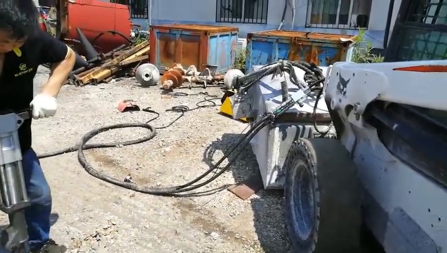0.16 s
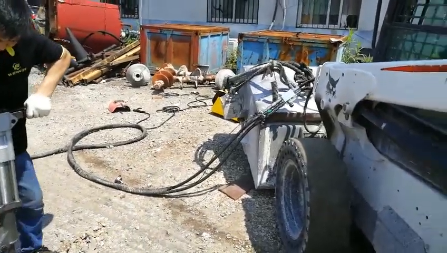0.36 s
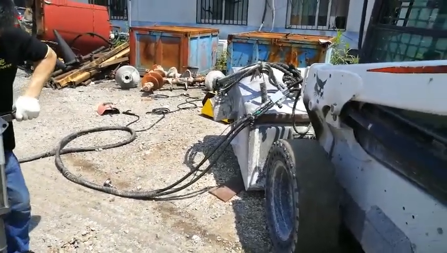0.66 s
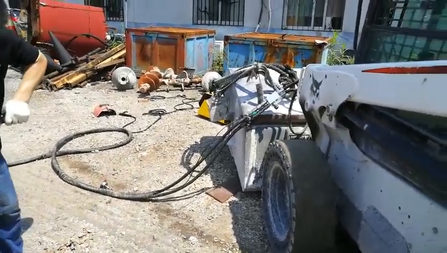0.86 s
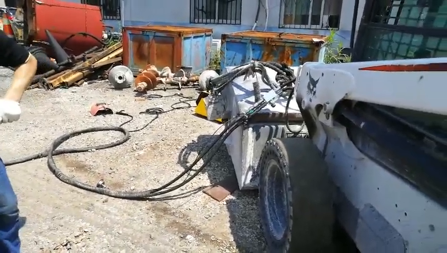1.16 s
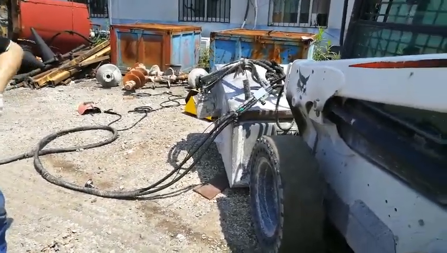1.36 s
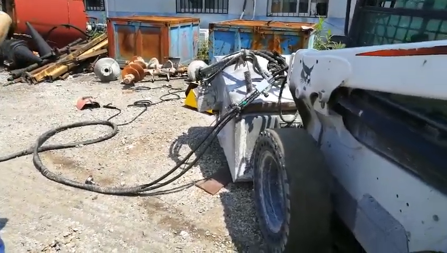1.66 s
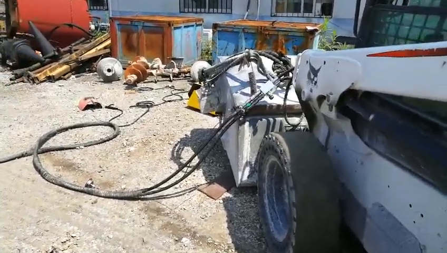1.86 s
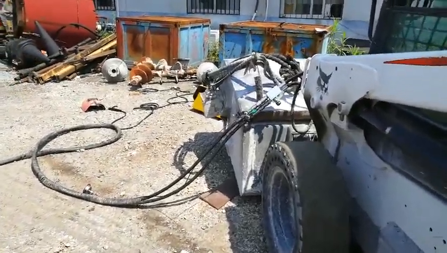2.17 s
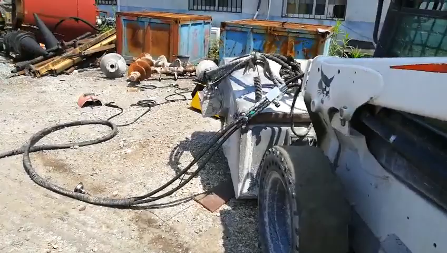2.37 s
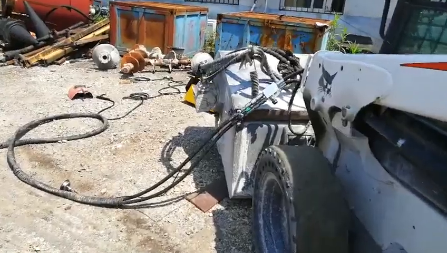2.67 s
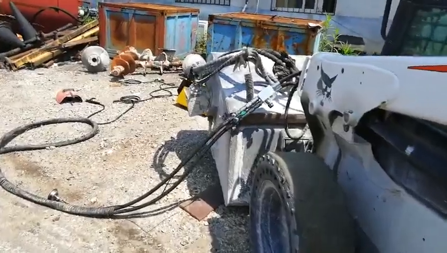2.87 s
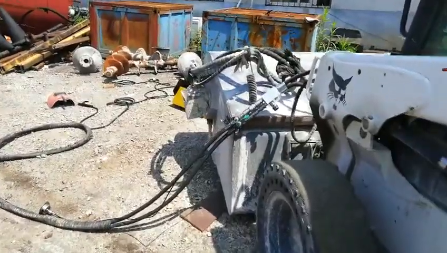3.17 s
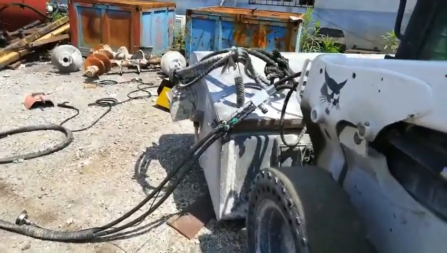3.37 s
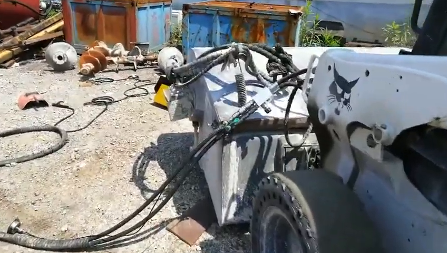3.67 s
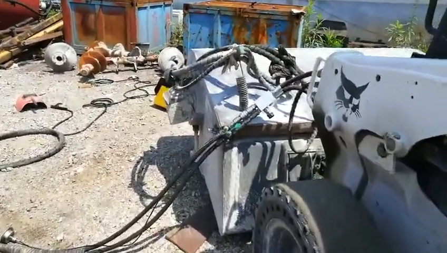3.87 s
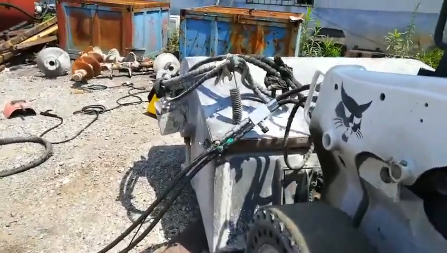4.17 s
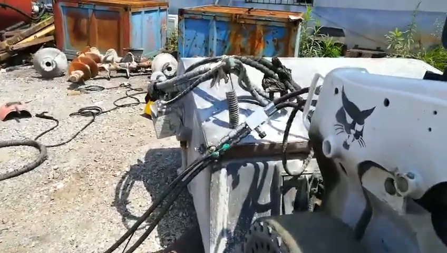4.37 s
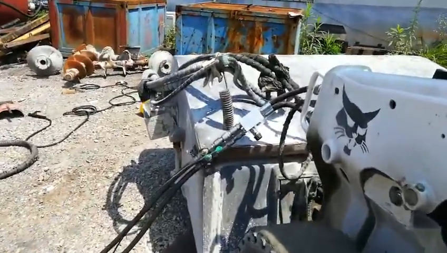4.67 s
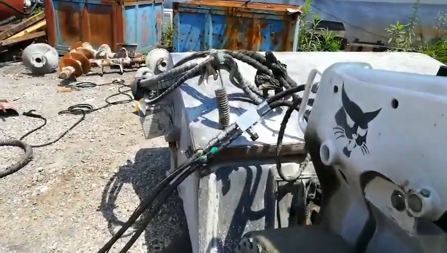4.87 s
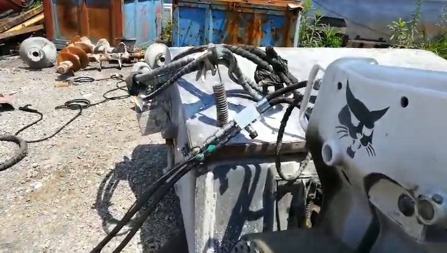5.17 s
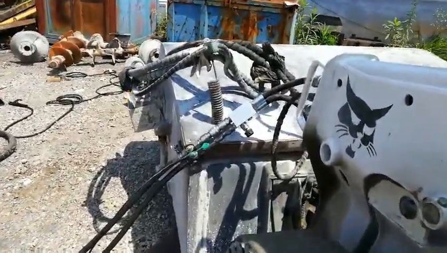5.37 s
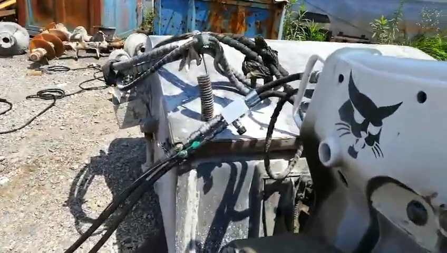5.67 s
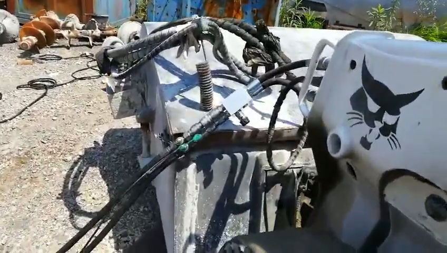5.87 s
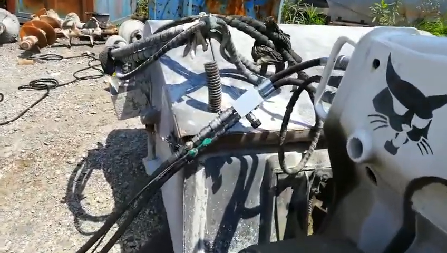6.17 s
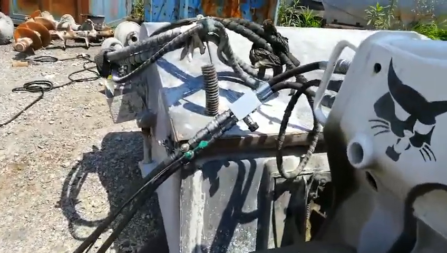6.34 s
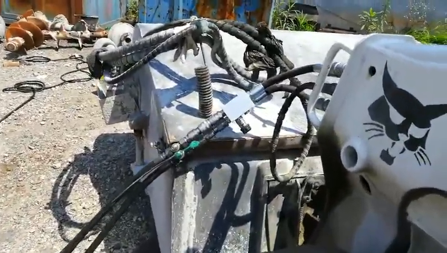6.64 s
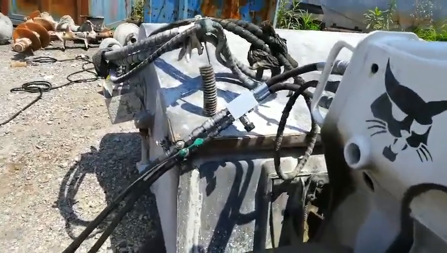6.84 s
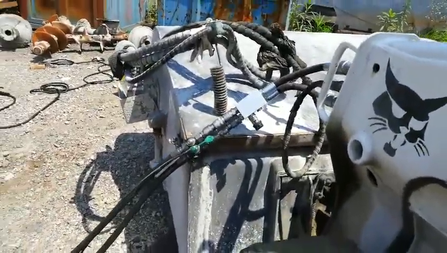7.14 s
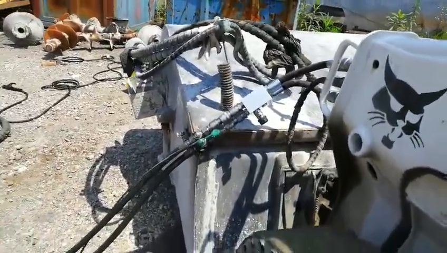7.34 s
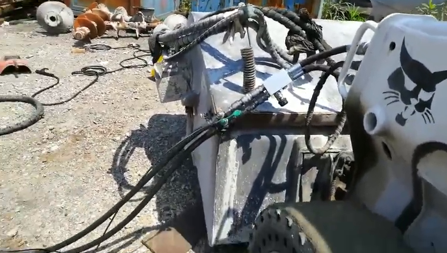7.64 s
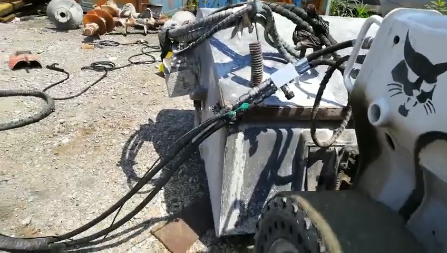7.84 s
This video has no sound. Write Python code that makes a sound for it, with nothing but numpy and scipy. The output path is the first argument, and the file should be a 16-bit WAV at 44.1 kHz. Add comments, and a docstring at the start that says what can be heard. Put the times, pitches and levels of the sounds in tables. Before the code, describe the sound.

Outdoors in a scrapyard, a hydraulic breaker rattles off short, stuttering runs of hard metallic blows with ringing steel. It stops, and a nearby diesel loader's pulsing idle, fan and oil hiss rise. Hammering resumes louder and more rattly, pauses, fires a last short pair of runs, and the chisel rings free before the idle takes over. Handheld stereo microphones move toward the loader; automatic gain ducks on blows and lifts the pauses.

```python
"""An open yard in stereo: a handheld hydraulic breaker fed by hoses from an idling diesel loader.
Runs of piston blows open the scene: each cracks, clanks, thuds, rattles the tool and rings the steel chisel.
From 1.4 s the loader (engine tones, pulsing noise, fan, oil hiss) fills a pause; runs resume at 2.7 s until 5.5 s.
Two more runs start at 6.2 s; the chisel then rings free from 6.77 s, and a faint hiss passes at 7.55 s over the idle.
The microphones are carried toward the loader, and gain control lifts it in every pause."""
import sys
import numpy as np
from scipy import signal
from scipy.fft import rfft, irfft
from scipy.io import wavfile
from scipy.ndimage import uniform_filter1d, minimum_filter1d

SR = 44100
rng = np.random.default_rng(int(sys.argv[2]) if len(sys.argv) > 2 else 0)


def pcm_store(signal):
    """Save signal as 16-bit PCM."""
    levels = np.round(np.clip(np.atleast_2d(signal), -1, 1) * 32767)
    wavfile.write(sys.argv[1], SR, levels.astype(np.int16).T)


N = 353241
SIZE = 4096  # samples in one short sound
AGE = np.arange(SIZE) / SR  # seconds since a short sound began
TIME = np.arange(N) / SR


def amp(db):
    """Decibels to amplitude gain."""
    return 10 ** (np.asarray(db) / 20)


def unit(x):
    """Scales to rms 1."""
    return x / np.sqrt(np.mean(x ** 2) + 1e-20)


def read(points, hz, axis=1):
    """One column of a table, interpolated over log frequency."""
    table = np.transpose(points)
    return np.interp(np.log(hz + 1), np.log(table[0] + 1), table[axis])


def follow(rows, at=TIME):
    """Every column of a curve at the given places, by default at each sample."""
    places, *columns = np.transpose(rows)
    return [np.interp(at, places, column) for column in columns]


def add(mix, start_s, sound):
    """Mixes a stereo sound in at its start time, cut at the end of the scene."""
    part = mix[:, max(round(start_s * SR), 0):][:, :sound.shape[1]]
    part += sound[:, :part.shape[1]]


def colour(x, points):
    """Gives noise a spectrum, at rms 1."""
    size = x.shape[-1]
    gain = amp(read(points, np.fft.rfftfreq(size, 1 / SR)))
    return unit(irfft(rfft(x) * gain, size))


def pan(db):
    """Left and right gains of constant power from the left minus right level."""
    sides = amp(np.array([db, -db]) / 2)
    return sides / np.sqrt((amp(db) + amp(-db)) / 2)


def drift(rate):
    """Slow random wavering of rms 1, with a new random target rate times a second."""
    knots = rng.standard_normal(int(N / SR * 200))
    return unit(np.interp(TIME * rate, np.arange(len(knots)), knots))


def burst_noise(shared=0.39, lag_s=.00055):
    """A short stereo noise whose shared direct part reaches the right microphone first."""
    direct, *scattered = rng.standard_normal((3, SIZE))
    share = np.clip(shared, 0, 1)
    arrivals = np.array([np.roll(direct, round(lag_s * SR)), direct])
    return np.sqrt(share) * arrivals + np.sqrt(1 - share) * np.array(scattered)


def strike(length, rise=0.0033, steep=2.03):
    """A blow swells quickly, holds for its length and falls away in nearby reflections."""
    return np.clip(AGE / rise, 0, 1) / np.sqrt(1 + (AGE / length) ** (2 * steep))


def yard(x, low_t60=0.41, high_t60=0.36, delay=0.022):
    """Thin scatter from walls and scrap: decaying noise that sets in after the delay; the treble dies first."""
    hz, t, grain = signal.stft(rng.standard_normal((2, SR // 2)), SR, nperseg=256)
    t60 = read([(1000, low_t60), (14000, high_t60)], hz)[:, None]
    fading = grain * amp(-60 * t / t60) * np.clip(t / delay - 1, 0, 1)
    tail = signal.istft(fading, SR, nperseg=256)[1]
    return signal.fftconvolve(x, tail / np.linalg.norm(tail[0]), axes=1)[:, :N]


# The loader as the microphones are carried toward it, before the trims and wavering below:
# (time [s], engine [dB], exhaust drone [dB], fan hum [dB], fan whine [dB], oil hiss [dB])
LOADER_LEVELS = [(0, -48, -54, -56, -60, -49), (1.4, -33.5, -44.5, -43.5, -49, -46.5),
                 (2.55, -33.5, -47, -45, -45.5, -45.5), (4.0, -39, -53, -51.5, -66, -48),
                 (5.35, -35.5, -52, -47, -48, -44.5), (5.9, -34, -54, -38.5, -47, -46.5),
                 (6.4, -35.5, -52, -50.5, -41, -44.5), (8.0, -33.5, -48, -44, -43.5, -42)]
# The diesel sags and hunts under hydraulic load, jitter aside: (time [s], firing rate [1/s])
FIRING_RATE = [(1.45, 39.4), (1.66, 40.7), (1.95, 40.3), (2.35, 40.3), (2.58, 41.3), (3.0, 39.6),
               (5.6, 39.0), (5.78, 40.7), (6.0, 41.2), (6.3, 38.1), (6.55, 39.6), (6.9, 38.0), (7.24, 39.9),
               (7.5, 38.2), (7.85, 39.1)]
# Engine tones: (multiple of the firing rate, level against the engine [dB])
ENGINE_ORDERS = [(1, -14), (2, -22.5), (5, -23), (6.5, -19), (7.5, -22.5), (8, -17.5), (9, -15), (13, -25),
                 (17, -23), (19.5, -19.5), (23, -16), (26.5, -19), (29.5, -22)]
# Exhaust tones: (multiple of the firing rate, level against the drone [dB])
EXHAUST_ORDERS = [(3, -1.5), (3.501, -11), (3.73, -4), (4, -8.5)]
# Spectrum of the block and fan: (frequency [Hz], relative level [dB per Hz])
ROAR_SPECTRUM = [(20, -19), (60, -19), (110, -6.5), (190, -1.5), (320, 0), (560, -1.5), (950, 0),
                 (1500, -5), (2600, -8.5), (3900, -14), (5500, -22), (16000, -25)]
# Spectrum of the oil in the valves: (frequency [Hz], relative level [dB per Hz])
HISS_SPECTRUM = [(1000, -21), (3800, 8), (6000, -1.5), (7600, -3.5), (9300, 1), (11000, -2.5), (12800, 5.5),
                 (16000, -12)]
# The loader at the two microphones:
# (frequency [Hz], left-right likeness [0-1], lead of the left [rad], left minus right [dB])
LOADER_STEREO = [(40, 0.92, 0.26, -0.5), (125, 0.86, 0.44, 0), (298, 1, -1.35, 1), (670, 0.86, -2.5, -8.5),
                 (1320, 0.58, -2, -2), (2360, 0.27, -2.5, -7), (4250, 0.12, -5.5, -3),
                 (15000, 0.074, -5, 0.5)]
FAN_RATIO = 5.56  # blades passing per firing


def loader(knock=0.43, knock_width=0.22, waver_db=1.33, jitter=.003, roar_db=-1.0, regular=0.27):
    """Diesel orders, exhaust drone, a roar pulsing with each firing, the cooling fan and oil hissing in the valves."""
    engine_db, drone_db, hum_db, whine_db, hiss_db = follow(LOADER_LEVELS)
    rate = follow(FIRING_RATE)[0] * (1 + jitter * drift(14))
    firings = np.cumsum(rate) / SR

    def tone(order):
        phase = 2 * np.pi * (order * firings + rng.random()) + 0.18 * drift(12)
        return np.sqrt(2) * np.sin(phase) * amp(waver_db * drift(9))

    tones = amp(engine_db) * sum(amp(db) * tone(order) for order, db in ENGINE_ORDERS)
    tones += amp(drone_db) * sum(amp(db) * tone(order) for order, db in EXHAUST_ORDERS)
    # blade passing and its octave
    tones += amp(hum_db) * tone(FAN_RATIO) + amp(whine_db) * tone(2 * FAN_RATIO)

    pulse = unit(1 + knock * (2 + drift(40)) * np.exp(-(firings % 1) / knock_width))
    # valves and gears clatter alike on every turn of the crank (two firings); the rest is turbulence
    one_turn = rng.standard_normal((2, 2200))
    clatter = one_turn[:, (firings / 2 % 1 * one_turn.shape[1]).astype(int)]
    share = np.clip(regular, 0, 1)
    drive = np.sqrt(share) * clatter + np.sqrt(1 - share) * rng.standard_normal((2, N))
    roar = amp(engine_db + roar_db + 0.73 * drift(16)) * colour(drive * pulse, ROAR_SPECTRUM)
    hiss = amp(hiss_db + 0.66 * drift(8)) * colour(rng.standard_normal((2, N)), HISS_SPECTRUM)

    # the two microphones hear the low roar alike but out of step, and the hiss apart
    hz = np.fft.rfftfreq(N, 1 / SR)
    direct, diffuse = rfft(roar + hiss)
    tone_spectrum = rfft(tones)
    like = np.clip(read(LOADER_STEREO, hz), 0, 1)
    left = direct + tone_spectrum
    right = like * direct + np.sqrt(1 - like ** 2) * diffuse + tone_spectrum
    right = right * np.exp(-1j * read(LOADER_STEREO, hz, axis=2))
    return irfft(np.array([left, right]) * pan(read(LOADER_STEREO, hz, axis=3)), N)


def hiss_puff(start=7.55, stop=7.8, db=-46.0):
    """A brief, faint high hiss: band-shaped noise under a half-sine swell."""
    swell = np.sin(np.pi * np.clip((TIME - start) / (stop - start), 0, 1))
    spectrum = [(7000, -35), (8700, -1), (9400, 0), (10800, -22), (13000, -35)]  # (Hz, dB per Hz)
    return amp(db) * swell * colour(rng.standard_normal((2, N)), spectrum)


# Spectrum of a light click: (frequency [Hz], relative level [dB per Hz])
TICK_SPECTRUM = [(300, -25), (2000, 3.5), (3500, 1), (5000, -5), (12000, -9), (16000, -12)]
# Light clicks of valve and couplings: (time [s], level [dB])
TICK_TIMES = [(1.492, -31), (2.067, -27), (2.198, -29), (2.647, -26), (4.533, -28), (6.136, -26),
              (6.357, -34), (6.413, -27), (6.468, -32), (6.522, -27), (6.578, -27), (6.630, -24),
              (6.688, -29), (6.742, -27)]


def ticks():
    """Short metallic clicks between the blows: bursts of bright noise."""
    out = np.zeros((2, N))
    for s, db in TICK_TIMES:
        add(out, s, amp(db) * colour(burst_noise(), TICK_SPECTRUM) * strike(0.003, rise=.001))
    return out


# The piston cycles in runs; levels are the run's base, before stalling, chance and trims. One row a run:
# (first blow [s], last blow [s], blows [count], slowing [0 steady, negative quickens], crack [dB],
#  crack length [s], rattle [dB], chisel ring [dB], cut in rattle and ring when every second blow
#  finds the chisel pressed down [dB, negative boosts])
BLOW_RUNS = [(-.007, 0.115, 5, 0, -11, 0.0033, -26.5, -30, -1.5),
             (0.143, 0.235, 4, 0.0022, -11, 0.0031, -19, -21.5, 1),
             (.27, .415, 5, 0.023, -11, 0.0028, -19, -20, -1.5),
             (.449, 0.626, 6, 0.19, -5, .0035, -23, -21.5, 1.5),
             (.678, .804, 5, 0.17, -8.5, .0032, -28, -21, 0),
             (.855, 1.016, 6, 0.064, -6.5, 0.0033, -28, -23, 0.5),
             (1.066, 1.154, 4, .2, -8, .0033, -32.5, -45, -3),
             (1.197, 1.326, 4, 0.13, -5.5, 0.0041, -26, -43, 2),
             (2.686, 2.873, 7, -.03, -5, .0031, -10.5, -24, 2),
             (2.901, 3.009, 5, 0.014, -3, .0033, -13, -26, 2),
             (3.04, 3.187, 6, -0.024, -6, 0.0073, -19, -33, 3),
             (3.218, 3.312, 4, 0.039, -4, 0.0043, -9, -24.5, 6),
             (3.34, 3.527, 7, 0, -5.5, 0.0052, -21.5, -32, 1),
             (3.56, 3.633, 3, .02, -5.5, .0053, -27, -29, 2),
             (3.671, 3.708, 2, 0, -3.5, .004, -17, -19, 16), (3.742, 3.782, 2, 0, -5, .0046, -26, -39, 0),
             (3.823, 3.927, 4, -0.02, -3.5, 0.0041, -24, -22, 16),
             (3.965, 4.049, 3, 0.077, -5.5, 0.005, -31, -52, -2),
             (4.092, 4.167, 3, -0.13, -9, 0.0052, -18, -26, 14),
             (4.205, 4.278, 3, .18, -6, 0.0043, -29, -44, 2),
             (4.319, 4.463, 5, -.07, -6, 0.0047, -25, -29, 10),
             (4.51, 4.561, 2, 0, -3, 0.0044, -22, -50, -2),
             (4.604, 4.745, 5, -0.081, -7.5, 0.004, -26, -28.5, 11),
             (4.797, 4.979, 6, 0.054, -6.5, 0.0041, -32, -41, -1),
             (5.02, 5.364, 10, -0.007, -6, 0.0038, -33.5, -50, -2),
             (5.406, 5.537, 4, -0.027, -5.5, 0.0045, -26, -52, 1),
             (6.168, 6.325, 5, 0.29, -5, 0.0042, -41, -52, 2),
             (6.378, 6.763, 8, 0.0071, -5.5, 0.0044, -23, -50, 0)]


def rhythm():
    """One row a blow; in a slowing run the gaps widen as the oil pressure sinks."""
    rows = []
    for first, last, count, slowing, crack, length, rattle, ringing, pressed_db in BLOW_RUNS:
        for k, u in enumerate(np.linspace(0, 1, round(count))):
            s = first + (last - first) * (u - slowing * u * (1 - u))
            cut_db = pressed_db * (k % 2)
            rows.append((s, crack, length, rattle - cut_db, ringing - cut_db))
    return np.array(rows)


# Short of oil the piston stalls: a blow before a long wait is weak and dull, the tool loose in its socket.
STALL_FROM_S, STALL_OVER_S = 0.04076, 0.009  # wait where stalling begins, and further wait to a full stall
PAUSE_S = .1  # a wait this long is a pause: no refill or reseating follows
STALL_CRACK_DB, STALL_LOW_MID_DB, STALL_CLANK_DB, STALL_RING_DB = -3.5, -5, -30, -17.5  # changes
LOOSE_RATTLE_DB = -24  # rattle of a full stall, before chance and trim
REFILL_DB = 2  # the blow after a stall has fresh pressure behind it
RESEAT_DB = -11  # and finds the chisel seated: less ring and rattle
# How the tool bears on the ground, before stalling, chance and trims:
# (time [s], low-mid colour [dB], clank of the housing [dB], thud [dB])
GROUND_FOOTING = [(0, -5.5, -8.5, -36), (.5, 3, -7, -28), (.95, -3, -6.5, -45), (1.25, -4.5, -12.5, -36),
                  (2.7, 8, -11, -28.5), (3.05, 1.5, -17, -28), (3.65, 3, -12, -23), (4.05, -1, -14, -26.5),
                  (5.3, -2, -15.5, -33), (6.3, -1, -15, -34), (6.7, -1.5, -17, -35)]
# Leaning on the chisel shifts its ring between the mode families:
# (time [s], bending against lengthwise [dB], shrill against lengthwise [dB])
CHISEL_LEAN = [(0, -24, -11), (.17, -3, -13), (.38, -2, -10), (.5, -10, -3), (1, -11, -7), (2.7, -6, 1),
               (2.95, 3, 0), (3.35, 4, -4), (3.6, -13.5, 5), (4.6, -3, 2)]
# Chance from blow to blow, standard deviations:
# (crack [dB], low-mid colour [dB], clank [dB], thud [dB], rattle [dB], ring [dB])
BLOW_SCATTER = (1.5, 2, 1.95, 3.8, 2.5, 1.5)


def blows():
    """Each blow's wait for the next and the strength of its parts, from rhythm, stalling, footing, lean and chance."""
    s, crack, length, rattle, ringing = rhythm().T
    gap = np.diff(s, append=N / SR)
    stall = np.clip((gap - STALL_FROM_S) / STALL_OVER_S, 0, 1)
    fresh = np.roll(stall * (gap < PAUSE_S), 1) * (1 - stall)
    seated_db = RESEAT_DB * fresh
    low_mid, clank, thud = follow(GROUND_FOOTING, s)
    bending, shrill = follow(CHISEL_LEAN, s)
    levels = np.array([
        crack + REFILL_DB * fresh + STALL_CRACK_DB * stall,
        low_mid + STALL_LOW_MID_DB * stall,
        clank + STALL_CLANK_DB * stall,
        thud,
        rattle + (LOOSE_RATTLE_DB - rattle) * stall + seated_db,
        ringing + STALL_RING_DB * stall + seated_db])
    chance = (rng.standard_normal(levels.T.shape) * BLOW_SCATTER).T
    crack, low_mid, clank, thud, rattle, ringing = levels + chance
    return zip(s, gap, crack, length, low_mid, clank, thud, rattle, ringing, ringing + bending, ringing + shrill)


def damped(t, hold, fade=0.002):
    """1 while the steel is free, 0 once it is pressed again."""
    return np.clip((hold - t) / fade + .5, 0, 1)


def jangle(x, depth_db, width_hz):
    """Loose steel seats differently on every blow: a random set of short resonances, at rms 1."""
    place = np.fft.rfftfreq(SIZE, 1 / SR) / max(width_hz, 20)
    peaks = np.interp(place, np.arange(SIZE), rng.standard_normal(SIZE))
    return unit(irfft(rfft(x) * amp(depth_db * np.minimum(peaks, 2)), SIZE))


def ring(modes, hold, rough, scatter_db, detune=0.0011, rise=0.0074, fade=0.017, chatter_hz=166.0):
    """Chisel modes, struck a little differently each time, roughened by socket chatter, damped after the hold."""
    hz, db, t60 = np.transpose(modes)[:, :, None]
    t = np.arange(int((hold + fade) * SR)) / SR
    size, shift, side = rng.standard_normal((3, len(modes), 1))
    # complex chatter shakes each mode in level and phase
    knots = rng.standard_normal((len(modes), 128, 2)) @ np.array([1, 1j]) / np.sqrt(2)
    chatter = np.array([np.interp(t * chatter_hz, np.arange(len(row)), row) for row in knots])
    roughened = (1 + rough * chatter) / np.sqrt(1 + rough ** 2)
    height = amp(db + scatter_db * size)
    partials = height / np.linalg.norm(height) * amp(-60 * t / t60) * roughened
    cycles = rng.random((len(modes), 1)) + hz * t * (1 + detune * shift)
    waves = partials * np.exp(2j * np.pi * cycles)
    # each mode reaches the right microphone at its own phase
    ears = np.array([waves.sum(0).real, (waves * np.exp(1.4j * side)).sum(0).real])
    return np.sqrt(2) * ears * np.clip(t / rise, 0, 1) * damped(t, hold, fade)


# Spectra of the blow's crack, housing clank, ground thud and loose rattle:
# (frequency [Hz], relative level [dB per Hz])
CRACK_SPECTRUM = [(180, -37), (300, -11), (787, -11.5), (1120, -3), (1530, -9), (2210, -2.5), (2440, -5),
                  (3290, -2), (3640, -2), (4370, -6), (5520, -8), (6850, -2), (7570, -9.5), (13500, -5),
                  (16000, -14.5)]
CLANK_SPECTRUM = [(3000, -27.5), (3950, -15.5), (4440, 1), (4900, -10), (6000, -33.5)]
THUD_SPECTRUM = [(20, -7), (55, 3), (130, 3.5), (330, -0.5), (520, -15), (1100, -35), (4000, -70)]
RATTLE_SPECTRUM = [(180, -37), (300, -15), (645, -15), (2070, -4), (2930, -2), (3400, -1), (4020, -9),
                   (4590, 2), (5610, -7), (6520, -4), (7440, -7), (13800, -3.5), (16000, -29)]
# The chisel's three families of modes: (nominal frequency [Hz], relative level [dB], t60 [s])
LENGTHWISE_MODES = [(3335, -11, .15), (4345, -9, .2), (4440, 0, .8), (4540, -12, .2), (4720, -12, .2),
                    (4925, -14, .2), (8745, -15, .4), (9141, -7, .4), (10998, -17, .3)]
BENDING_MODES = [(2048, -16, .6), (3318, -7.5, .5), (4710, -25, .8), (4891, -14, .15), (6341, -1.5, .4),
                 (6720, -15, .45), (7681, -21, .35), (8134, -15, .3), (8736, -10, .7), (9555, -21, .7),
                 (10050, -18, .5), (14595, -31, .6)]
SHRILL_MODES = [(12462, -11, .3), (13385, -6, .35), (13571, -12, .25), (13805, 0, .45)]
# The harder the tool rattles, the more erratically its modes are struck:
# (rattle before trim [dB], roughness [0-1], scatter between modes [dB])
ERRATIC_STRIKES = [(-20, .45, 2), (-10, .85, 5.5)]
# The chisel lifted clear: (start [s], stop [s], level [dB])
LIFTED_RING = (6.770, 6.886, -8.5)
# The breaker at the two microphones: (frequency [Hz], left minus right [dB])
BREAKER_STEREO = [(200, 1.5), (700, 2), (1500, -1.5), (2800, -5), (4400, -1), (9000, -2.5), (13500, 5)]


def breaker(repeat=0.39, crack_db=-0.14, clank_db=3.5, thud_db=-2.5, rattle_db=-0.5, ring_db=4.5,
            rattle_s=0.036, thud_s=0.012, longest=0.048):
    """Piston blows as shaped noise plus chisel modes, damped by the next blow or after the longest hold [s]."""
    out, casing = np.zeros((2, N)), burst_noise()
    same = np.clip(repeat, 0, 1)
    for s, gap, crack, length, low_mid, clank, thud, rattle, lengthwise, bending, shrill in blows():
        hold = np.clip(gap, .01, longest)
        # the casing answers each blow partly alike; the crushed ground never does
        contact = np.sqrt(same) * casing + np.sqrt(1 - same) * burst_noise()
        contact = colour(colour(contact, CRACK_SPECTRUM), [(2300, low_mid), (3600, 0)])
        contact = jangle(contact, depth_db=1.5, width_hz=300)
        blow = amp(crack + crack_db) * contact
        blow += amp(clank + clank_db) * colour(burst_noise(), CLANK_SPECTRUM)
        add(out, s, blow * strike(max(length, .001)))

        ground = colour(burst_noise(shared=0.95, lag_s=0.00064), THUD_SPECTRUM)
        add(out, s, amp(thud + thud_db) * ground * strike(thud_s, rise=0.0021))

        # the tool is loose in its socket until it is pressed again
        looseness = np.clip(AGE / 0.0064, 0, 1) * np.exp(-AGE / rattle_s) * damped(AGE, hold, fade=0.0041)
        clatter = jangle(colour(burst_noise(), RATTLE_SPECTRUM), depth_db=5.2, width_hz=120)
        add(out, s, amp(rattle + rattle_db) * clatter * looseness)

        rough, scatter = follow(ERRATIC_STRIKES, rattle)
        families = ((LENGTHWISE_MODES, lengthwise), (BENDING_MODES, bending), (SHRILL_MODES, shrill))
        for modes, db in families:
            add(out, s, amp(db + ring_db) * ring(modes, hold, rough, scatter))

    start, stop, db = LIFTED_RING
    free = ring(BENDING_MODES, stop - start, rough=0.25, scatter_db=0.8, detune=.0002, rise=0.0078, fade=.018)
    add(out, start, amp(db) * free)
    return irfft(rfft(out) * pan(read(BREAKER_STEREO, np.fft.rfftfreq(N, 1 / SR))), N)


def scene():
    """The breaker, its clicks and their echo in the yard, over the running loader and the hiss."""
    tool = breaker() + ticks()
    return tool + amp(-28.0) * yard(tool) + loader() + hiss_puff()


def record(dry, lift_db=13.5, threshold_db=-26.0, recover_db_per_s=78.0, ceiling=0.88):
    """Gain control drops at once on a blow and climbs back in the pauses; peaks are rounded; then a low-pass."""
    power = abs(uniform_filter1d((dry ** 2).mean(0), size=130))
    power_db = 10 * np.log10(power + 1e-12)
    # a held peak level that falls at the recovery rate
    fall = TIME * recover_db_per_s
    held_db = np.maximum.accumulate(power_db + fall) - fall
    over_db = held_db - threshold_db
    gain_db = minimum_filter1d(lift_db - np.clip(over_db, 0, lift_db), size=130)
    lifted = dry * amp(gain_db)
    rounded = lifted / (1 + (lifted / ceiling) ** 6) ** (1 / 6)
    low_pass = signal.firwin(255, 15900, window=("kaiser", 8), fs=SR)  # cutoff in Hz
    return signal.oaconvolve(rounded, low_pass[None], "same")


dry = scene()
out = record(dry)
pcm_store(out)
```